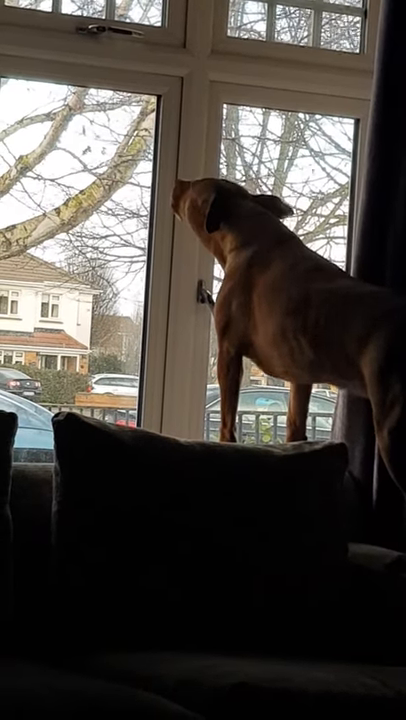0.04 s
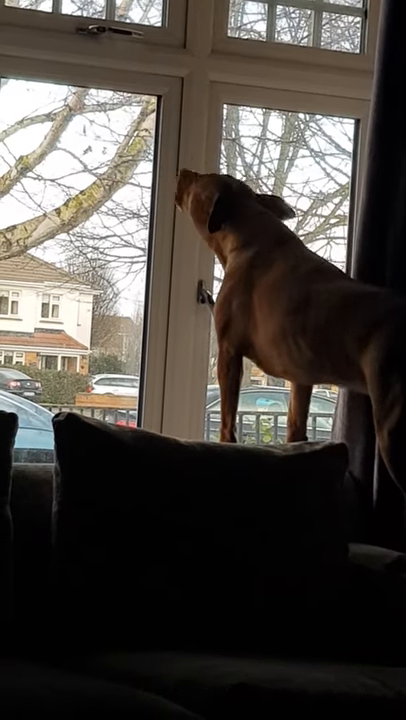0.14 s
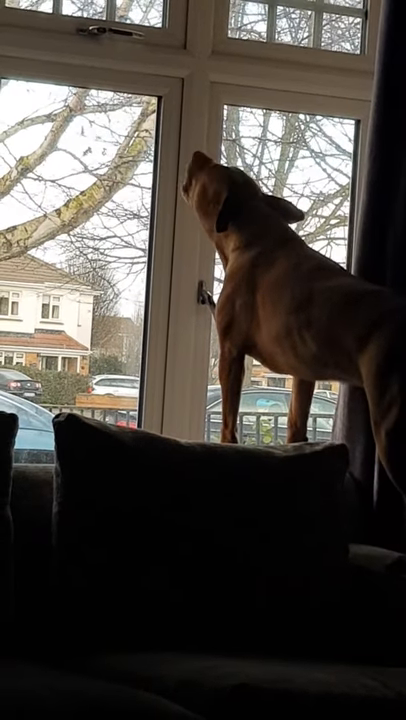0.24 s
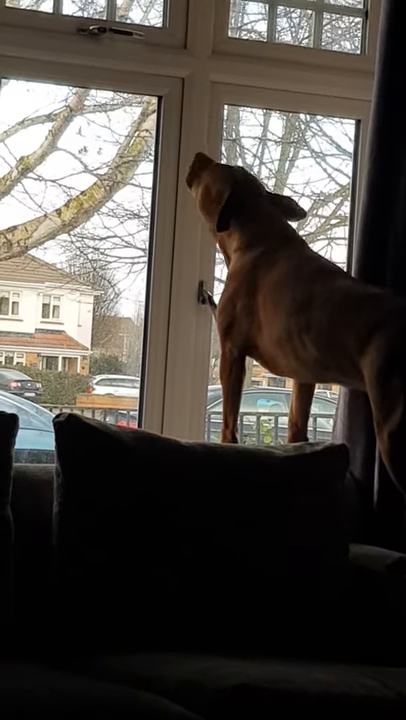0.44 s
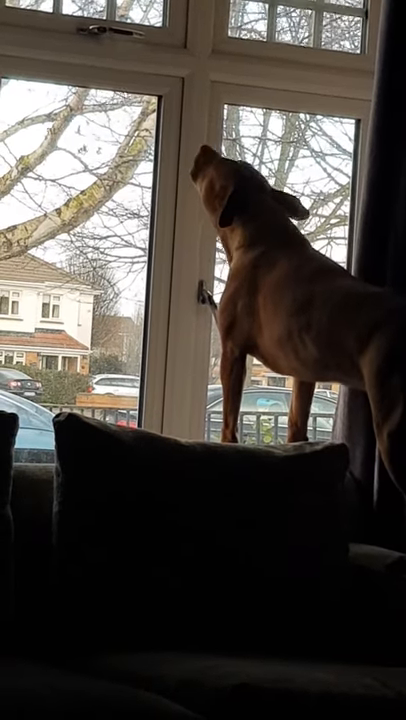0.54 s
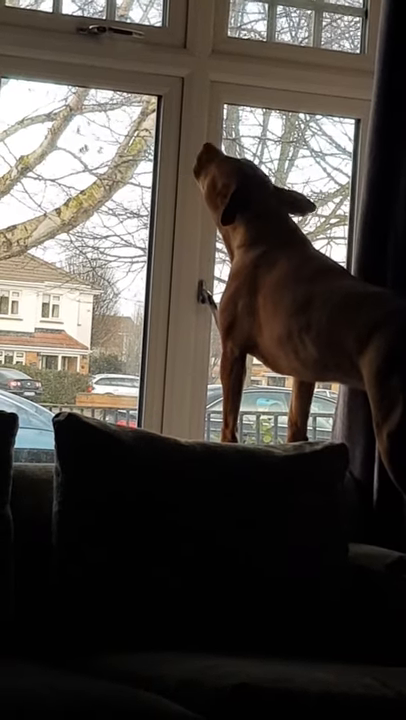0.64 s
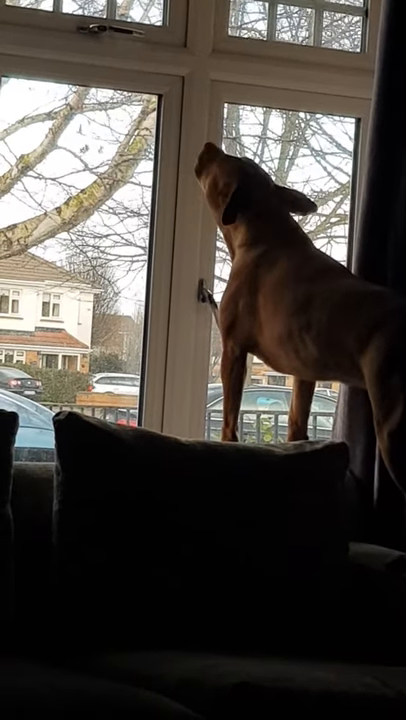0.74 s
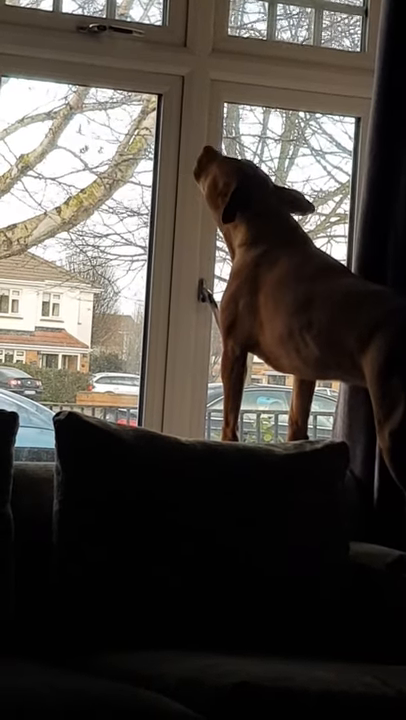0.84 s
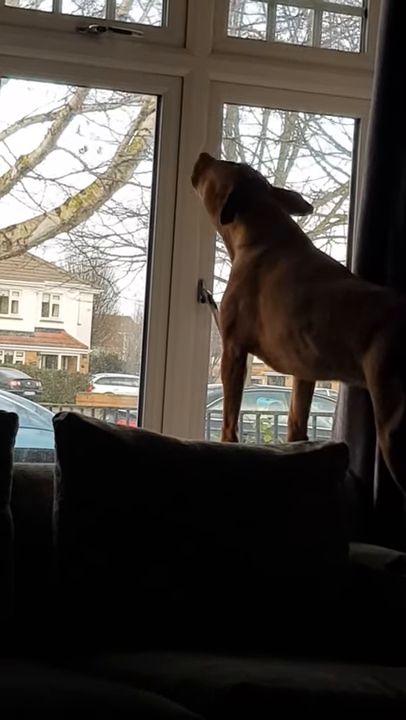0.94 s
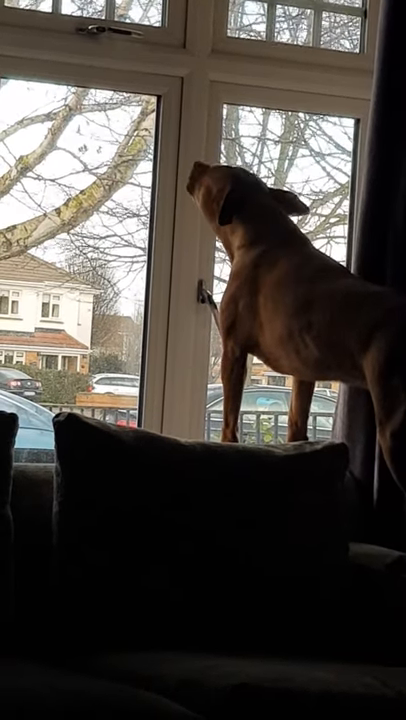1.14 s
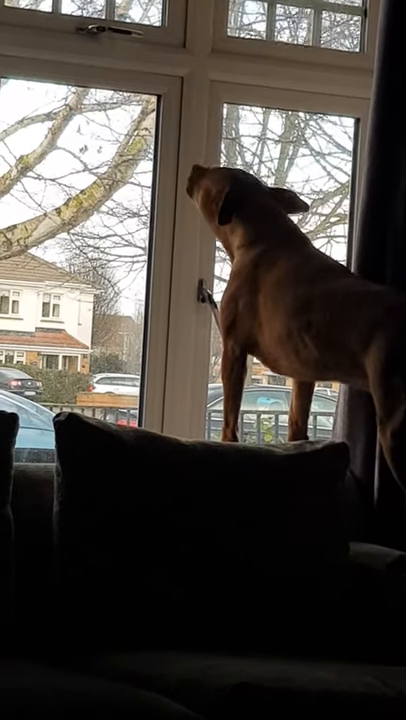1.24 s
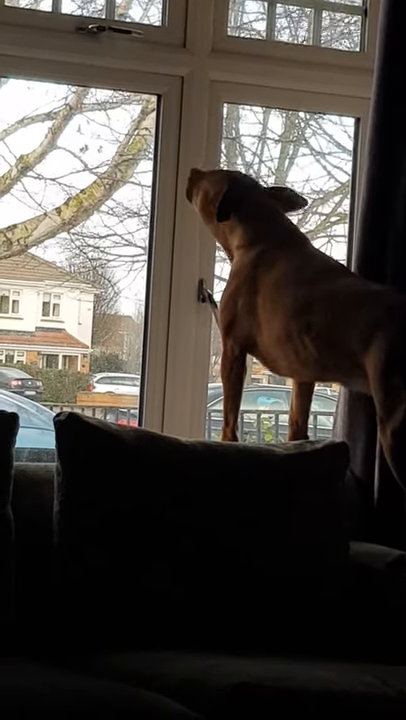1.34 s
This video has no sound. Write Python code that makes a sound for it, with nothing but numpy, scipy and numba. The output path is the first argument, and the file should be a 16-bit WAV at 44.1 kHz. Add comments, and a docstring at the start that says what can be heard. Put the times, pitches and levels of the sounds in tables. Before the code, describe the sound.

Indoor dog call: a brief bright yelp, straight after it a quiet, nearly pure falling howl with a faint nasal whistle, dying into a short room echo over faint low rumble and hum, phone microphone.

```python
"""At a living-room window a dog gives a short rising yelp, then a soft falling howl with a thin nasal whistle.
The voice is additive: a strong fundamental and three weaker harmonics, plus noise and pulses for the rasp.
A feedback delay network and two echoes let the room ring on after it.
Shaped noise makes a low rumble that dies away and a quiet floor; a sine makes the mains hum.
A phone listens: its limiter eases the peaks down and a low-pass cuts the top."""
import sys
import numpy as np
from scipy import signal
from scipy.fft import rfft, irfft
from scipy.io import wavfile
from scipy.ndimage import uniform_filter1d, minimum_filter1d
from numba import njit

SR = 44100
rng = np.random.default_rng(int(sys.argv[2]) if len(sys.argv) > 2 else 0)


def transcribe(u):
    """Save the signal u as a 16-bit wav file named by the first command-line argument.

    u: samples, shape (n,) or (channels, n), limited to [-1, 1]; the rate is SR.
    q: integer samples, one column per channel.
    """
    v = np.clip(np.atleast_2d(u).T, -1, 1)
    q = np.round(v * 32767).astype(np.int16)
    wavfile.write(sys.argv[1], SR, q)


N = 61739  # length in samples
OPPOSITE = np.array([[1], [-1]])  # a side signal enters left and right in opposite phase


def undb(db):
    """Amplitude ratio of a level: 20 dB is a factor of ten."""
    return 10 ** (np.asarray(db) / 20)


def colour(x, points):
    """Spectral shaping: filter x through (Hz, dB) points joined on a log-frequency axis, to rms 1."""
    hz, db = np.array(points).T
    f = np.arange(N // 2 + 1) * SR / N + 1  # 1 Hz up, so the logarithm exists at zero
    gain = undb(np.interp(np.log(f), np.log(hz), db, left=-80))
    y = irfft(rfft(x) * gain, N)
    return y / np.sqrt(np.mean(y ** 2))


def walk(rate):
    """Low-pass random modulation: levels held 1 / rate s and slewed twice, with a spread near 1."""
    k = int(SR / rate)
    steps = np.repeat(rng.standard_normal(N // k + 1), k)
    return 1.30 * uniform_filter1d(uniform_filter1d(steps, k), k)[:N]


def band(hz, width):
    """Quadrature modulation: two slow random signals on one carrier, which may glide, make narrow noise."""
    phase = 2 * np.pi * np.cumsum(hz * np.ones(N)) / SR
    return walk(2 * width) * np.cos(phase) + walk(2 * width) * np.sin(phase)


def vocal_folds(turns, tones_db, flutter):
    """Additive synthesis of the harmonics; random amplitude modulation adds sidebands that roughen them."""
    hz, width, depth_db, start_s = flutter
    onset = np.clip((np.arange(N) / SR - start_s) / 0.027, 0, 1)
    wobble = 1 + undb(depth_db) * band(hz, width) * onset
    tone = sum(np.sqrt(2) * undb(db) * np.sin(2 * np.pi * (k + 1) * turns) for k, db in enumerate(tones_db))
    return tone * wobble


def throat_rasp(turns, level_db):
    """Source and filter: breath noise puffed once a cycle, with pulses, is coloured by the throat."""
    # Resonances of the throat. Each row: frequency in Hz, level in dB (relative)
    throat_points = [(560, 18.5), (900, 14), (1200, 3.5), (1600, -4.5), (2100, 1.5), (2420, -7.5),
                     (2720, -30), (3100, -9), (3900, -6), (4300, -17.5), (5000, -11.5), (5700, -5),
                     (6200, -26.5), (7300, -8), (8500, -19.5), (10000, -21), (13000, -22), (15500, -27.5)]
    puff_decay = 0.76  # cycles
    pulse_db, side_gain = -13, .6
    level_band_hz = (2800, 6000)  # level_db holds in this band of the mid signal

    harmonics = sum(np.cos(2 * np.pi * k * turns) for k in range(5, 19)) / np.sqrt(7)
    pulses = undb(pulse_db + 3 * walk(60)) * harmonics
    puff = np.exp(-(turns % 1) / puff_decay) * undb(2.2 * walk(220))
    mid = colour(puff * rng.standard_normal(N) + pulses, throat_points)
    side = colour(puff * rng.standard_normal(N), throat_points)
    sos = signal.butter(3, level_band_hz, "band", fs=SR, output="sos")
    in_band = signal.sosfilt(sos, mid).std()
    return undb(level_db) / in_band * (mid + side_gain * side * OPPOSITE)


def call(table, flutter, left_db, t):
    """Voiced sound: one phase, with random jitter, drives both the harmonics and the rasp."""
    jitter, fade_s = 0.0035, 0.0059  # jitter as a fraction of the pitch
    rows = np.array(table).T
    hz, *tones_db, rasp_db = (uniform_filter1d(np.interp(t, rows[0], c), int(fade_s * SR)) for c in rows[1:])
    turns = np.cumsum(hz * (1 + jitter * walk(150))) / SR
    voice = vocal_folds(turns, tones_db, flutter) + throat_rasp(turns, rasp_db)
    gate = np.clip(np.minimum(t - rows[0, 0], rows[0, -1] - t) / fade_s, 0, 1)
    return gate * voice * undb(left_db / 2 * OPPOSITE)  # left_db: left over right


def yelp(t):
    """Pitch contour: the fundamental rises fast, then falls off as the voice stops."""
    # Each row: time in seconds, pitch in Hz, levels of harmonics 1 to 4 in dB,
    # level of the rasp in dB between 2800 and 6000 Hz
    yelp_points = [(.193, 525.7, -71.5, -70.5, -76, -74, -89.5),
                   (.201, 529, -14.5, -41.5, -42.5, -51, -69.5),
                   (.208, 523.4, -14.5, -35.5, -47.5, -47, -54),
                   (.215, 600.3, -25, -14.5, -38.5, -62.5, -45.5),
                   (.227, 591.7, -17, -15, -38.5, -56.5, -41.5), (.233, 785, -9, -36.5, -59, -68.5, -39.5),
                   (.244, 767.6, -8.5, -36.5, -66, -65.5, -38), (.258, 813, -6.5, -27, -54.5, -58.5, -36.5),
                   (.3, 810.2, -4, -54.5, -55, -56, -43), (.317, 826.3, -15, -50.5, -62, -57.5, -45),
                   (.33, 797.3, -13.5, -52.5, -51, -59.5, -45.5),
                   (.35, 776.6, -9, -53.5, -64.5, -60.5, -45.5), (.36, 732, -27, -63, -67, -65, -49.5),
                   (.385, 652.7, -29, -58, -92, -73.5, -52), (.46, 618, -80, -88, -91.5, -94.5, -69.5)]
    # flutter: Hz, width in Hz, depth in dB, start in s; the yelp is over before it starts
    return call(yelp_points, (200, 251, -32, 0.5), 3.5, t)


def howl(t):
    """Pitch contour: a longer, softer tone sinks while its harmonics swell and fade."""
    # Each row: time in seconds, pitch in Hz, levels of harmonics 1 to 4 in dB,
    # level of the rasp in dB between 2800 and 6000 Hz
    howl_points = [(.365, 480, -62.5, -83.5, -108.5, -101.5, -93),
                   (.385, 503.3, -29.5, -64.5, -85, -95, -95.5), (.44, 453, -53, -59, -82, -90, -76),
                   (.465, 474.5, -37, -53.5, -66, -82, -65.5), (.5, 486.8, -21, -31, -57.5, -53.5, -68.5),
                   (.524, 514, -20, -47.5, -60.5, -46.5, -65.5), (.558, 485.5, -20.5, -39, -60, -49, -68.5),
                   (.576, 469, -46, -48, -63, -82.5, -72), (.602, 456.6, -25.5, -54.5, -66.5, -74.5, -72),
                   (.633, 432.1, -28.5, -51.5, -69.5, -91.5, -77.5),
                   (.652, 441.6, -32.5, -40, -58.5, -79, -76.5), (.686, 431, -32.5, -52, -74, -76.5, -79),
                   (.795, 422.3, -25, -50.5, -65.5, -89.5, -86),
                   (.845, 416.2, -30.5, -70, -63.5, -95.5, -85.5), (1.04, 415, -31, -53, -65, -91.5, -99),
                   (1.09, 402.3, -40, -51, -80.5, -88, -100), (1.13, 403.2, -41.5, -48, -74.5, -100, -100),
                   (1.18, 400.3, -46, -56, -80, -100, -100), (1.245, 404.7, -50, -72, -105, -110, -100),
                   (1.3, 395, -73.5, -86, -100, -110, -100)]
    # flutter: Hz, width in Hz, depth in dB, start in s
    return call(howl_points, (125, 69.5, -34.5, 0.8), 4.5, t)


def nasal_whistle(t):
    """Narrow-band noise: a randomly varying tone in the nose follows a gliding centre."""
    # Each row: time in seconds, pitch in Hz, level in dB
    whistle_points = [(0.481, 8900, -86), (0.581, 8600, -71), (0.669, 8230, -69), (0.741, 8330, -83),
                      (0.859, 7950, -85.5)]
    s, hz, db = np.array(whistle_points).T
    level = undb(np.interp(t, s, db, left=-140, right=-140))
    return band(np.interp(t, s, hz), 300) * level  # width in Hz


def undertone(t):
    """Phase accumulation: a faint sine under the howl glides down with a randomly varying level."""
    # Each row: time in seconds, pitch in Hz, level in dB (mean)
    undertone_points = [(.56, 312, -72), (.595, 309, -57), (.72, 310, -70.5), (.8, 285, -70),
                        (.91, 261.2, -59), (1.06, 255.3, -70.5)]
    s, hz, db = np.array(undertone_points).T
    tone = np.sin(2 * np.pi * np.cumsum(np.interp(t, s, hz)) / SR)
    level_db = np.interp(t, s, db, left=-140, right=-140) + 2.1 * walk(30)
    return np.sqrt(2) * tone * undb(level_db)


def puffs_and_thump(t):
    """Windowed noise: each faint airy puff, and one soft low thump near 1.24 s, is a band that swells and fades."""
    # Each row: middle in seconds, length in seconds, centre in Hz, width in Hz, level at the middle in dB;
    # the row centred near 280 Hz is the thump
    noise_rows = [(0.003, 0.41, 4215, 507, -70.5), (0.117, 0.28, 7440, 901, -72.5),
                  (0.152, 0.22, 1976, 102.8, -72), (0.963, 0.24, 2628, 481, -79.5),
                  (1.159, 0.13, 2263, 204.3, -79), (1.161, 0.11, 2900, 300.4, -80.5),
                  (1.207, 0.17, 3446, 89.6, -79), (1.329, 0.43, 1972, 199.7, -81),
                  (1.341, 0.34, 7960, 786.5, -81), (1.241, 0.1, 280.2, 201.1, -64.5)]
    out = np.zeros(N)
    for middle, length, hz, width, db in noise_rows:
        swell = np.cos(np.pi * np.clip((t - middle) / length, -.5, .5)) ** 2
        out += undb(db) * band(hz, width) * swell
    return out


@njit
def walls(x, lags, gain, damp):
    """Feedback delay network: eight lines feed each other, duller on every round."""
    line, soft, out = np.zeros((8, 4096)), np.zeros(8), np.zeros((2, len(x)))
    for i in range(len(x)):
        total = 0.
        for k in range(8):
            # one-pole low-pass on what comes back
            soft[k] += (1 - damp) * (gain[k] * line[k, (i - lags[k]) & 4095] - soft[k])
            total += soft[k]
            out[k % 2, i] += soft[k]
        for k in range(8):
            line[k, i & 4095] = x[i] + soft[k] - total / 4  # this mixing keeps the energy
    return out


def reverberation(direct):
    """Exponential decay: each line's gain follows from its delay and the time to fall 60 dB."""
    # Delays of the eight lines in samples
    wall_lags = np.array([431, 613, 857, 1123, 1433, 1801, 2207, 2687])
    t60_s = 0.43  # before damping
    damp, level_db, width, left_db = 0.5, -14.5, 0.39, 2
    a, b = walls(direct.mean(axis=0), wall_lags, undb(-60 * wall_lags / SR / t60_s), damp)
    room = np.array([a + width * b, a - width * b])
    return undb(level_db) * room * undb(left_db / 2 * OPPOSITE)


def echoes(direct):
    """Discrete reflection: delayed, weaker copies off a near wall and down the hall, left and right swapped."""
    # Each row: delay in seconds, level in dB (relative to the direct sound)
    echo_rows = [(.021, -15.5), (.085, -23.5)]
    out = np.zeros((2, N))
    for delay_s, db in echo_rows:
        late = np.pad(direct, ((0, 0), (int(delay_s * SR), 0)))
        out += undb(db) * late[::-1, :N]
    return out


def low_rumble(t):
    """Exponential decay: shaped noise falls by 60 dB in each decay time, with random swells."""
    # Each row: frequency in Hz, spectral level in dB (relative)
    rumble_points = [(25, -17.5), (70, 0.5), (150, -18.5), (240, -2.5), (350, -18.5), (420, -9.5),
                     (700, -19.5), (1800, -37.5), (9000, -40.5), (15000, -60)]
    start_db, t60_s = -46.5, 0.59
    level = undb(start_db - 60 * t / t60_s + 2.5 * walk(26))
    return level * colour(rng.standard_normal(N), rumble_points)


def mains_hum(t):
    """Sinusoid at the mains frequency, its level modulated slowly at random."""
    return np.sqrt(2) * undb(-71.5 + 1.0 * walk(10.0)) * np.sin(2 * np.pi * 50 * t)


def noise_floor():
    """Mid-side stereo: shaped noise whose side part is high-passed is wider in the treble."""
    # Each row: frequency in Hz, spectral level in dB (relative)
    floor_points = [(25, -15), (50, -7.5), (100, -9), (200, -10), (400, -12.5), (800, -11.5), (1500, -32.5),
                    (3000, -31), (6200, -45.5), (8000, -35.5), (15500, -38.5)]
    mid, side = (colour(rng.standard_normal(N), floor_points) for _ in range(2))
    side = signal.sosfilt(signal.butter(2, 1200, "high", fs=SR, output="sos"), side)
    return undb(-66.5) * (mid + 0.45 * side * OPPOSITE)


def background(t):
    """Superposition of rumble, hum and floor, slightly stronger on the left."""
    return (low_rumble(t) + mains_hum(t) + noise_floor()) * undb(.6 * OPPOSITE)


def scene():
    """Superposition: direct sound, its echoes and reverberation, and the background add up."""
    t = np.arange(N) / SR
    direct = yelp(t) + howl(t) + nasal_whistle(t) + undertone(t) + puffs_and_thump(t)
    return direct + echoes(direct) + reverberation(direct) + background(t)


def record(dry):
    """Peak limiting: the phone's gain dips smoothly round loud peaks; an elliptic low-pass cuts the top."""
    peak_top, hold_s, top_hz = .99, .006, 15350
    k = int(hold_s * SR)
    gain = np.minimum(1, peak_top / (np.abs(dry).max(axis=0) + 1e-9))
    gain = uniform_filter1d(minimum_filter1d(gain, 2 * k), k)
    return signal.sosfilt(signal.ellip(10, .2, 90, top_hz, fs=SR, output="sos"), dry * gain)


dry = scene()
out = record(dry)
transcribe(out)
```